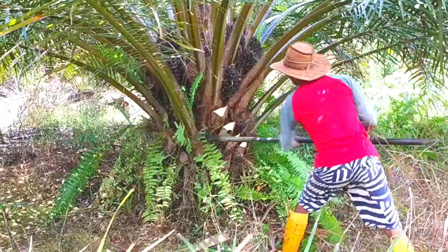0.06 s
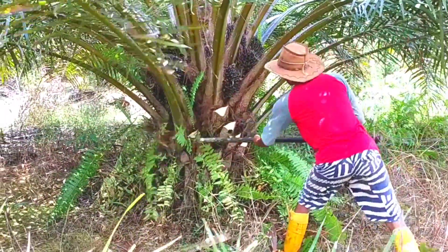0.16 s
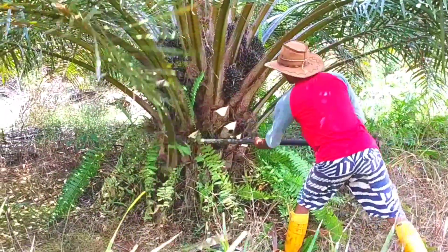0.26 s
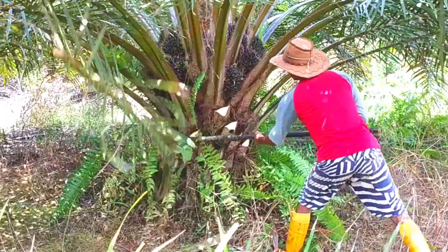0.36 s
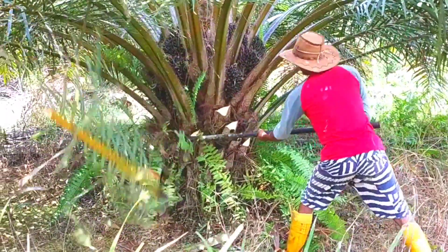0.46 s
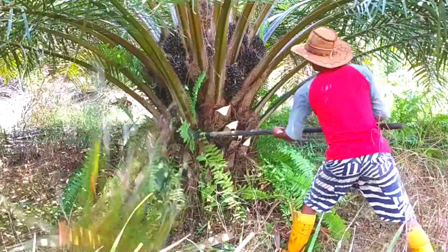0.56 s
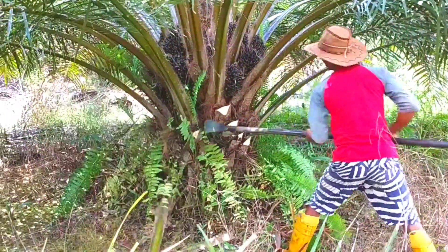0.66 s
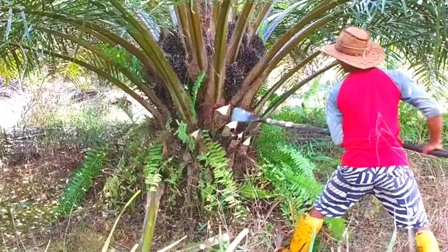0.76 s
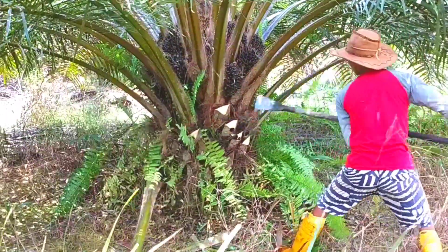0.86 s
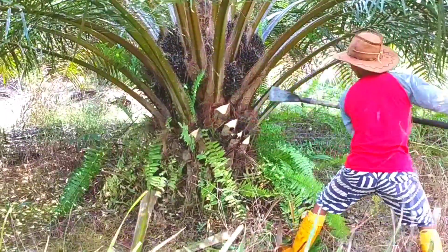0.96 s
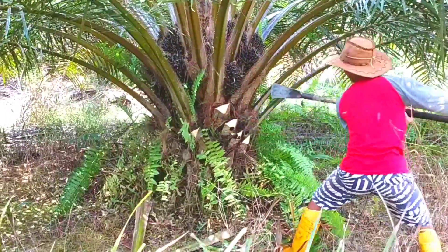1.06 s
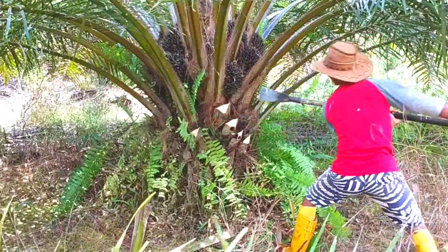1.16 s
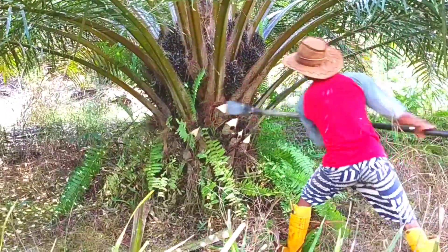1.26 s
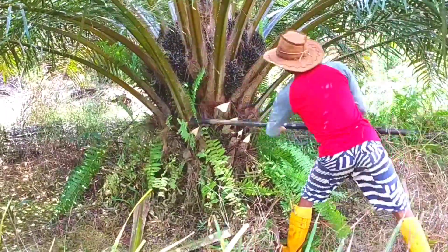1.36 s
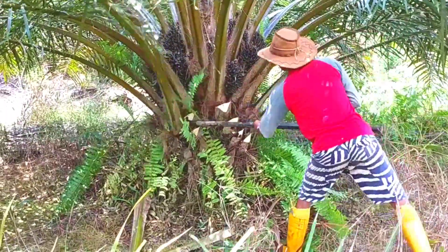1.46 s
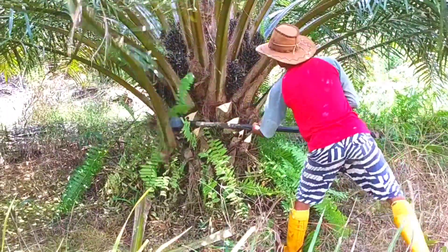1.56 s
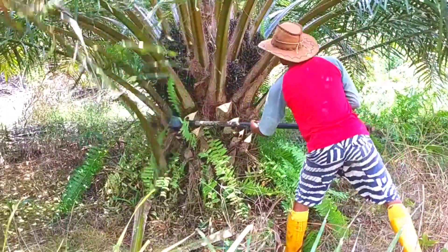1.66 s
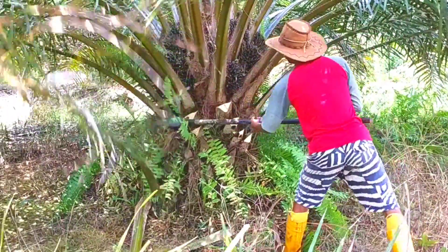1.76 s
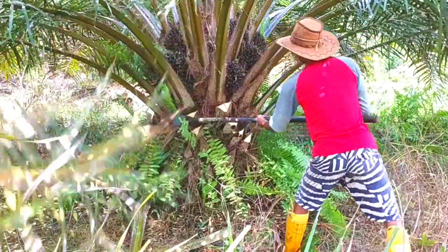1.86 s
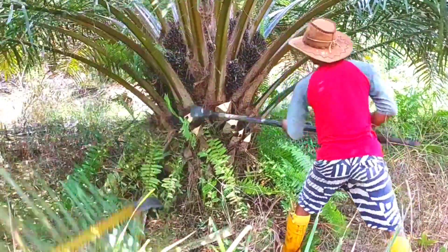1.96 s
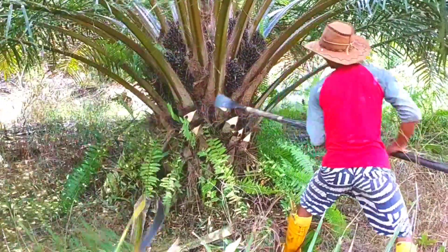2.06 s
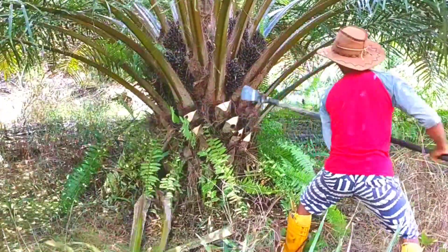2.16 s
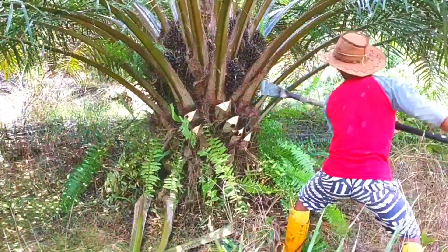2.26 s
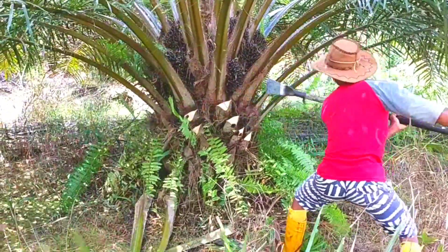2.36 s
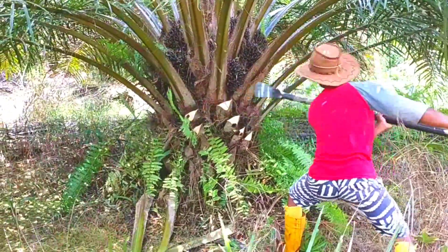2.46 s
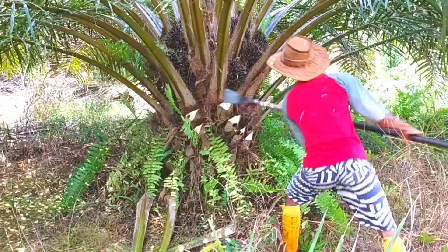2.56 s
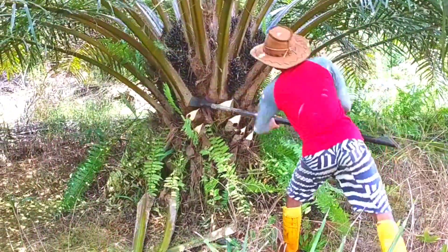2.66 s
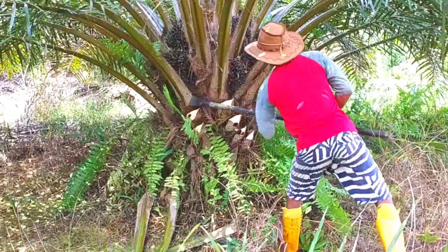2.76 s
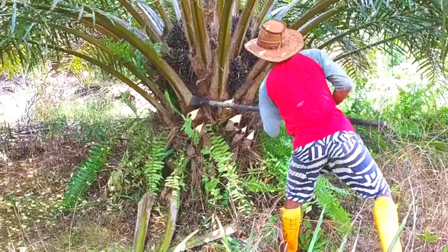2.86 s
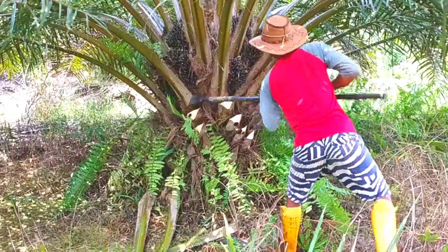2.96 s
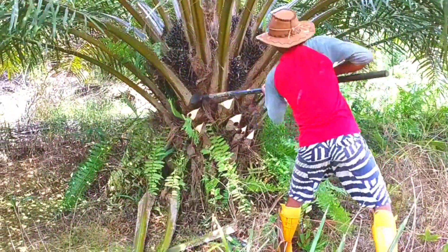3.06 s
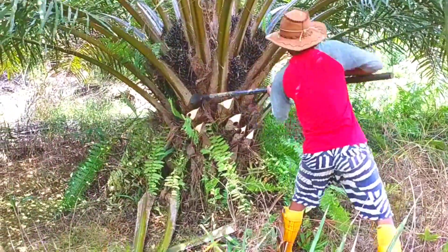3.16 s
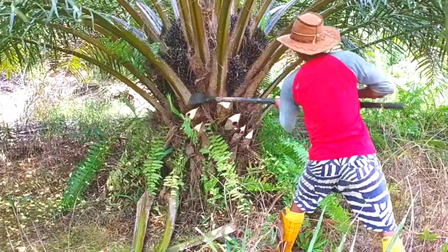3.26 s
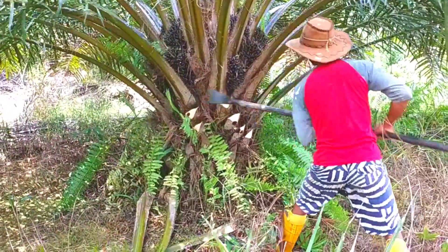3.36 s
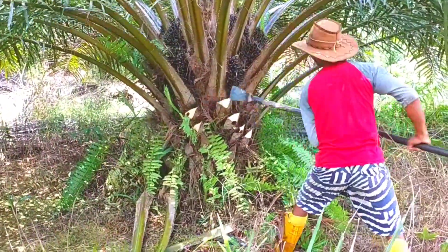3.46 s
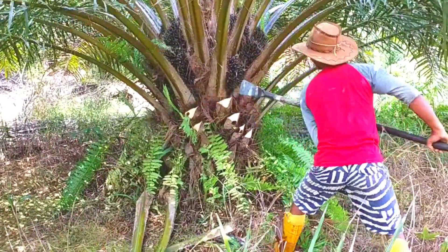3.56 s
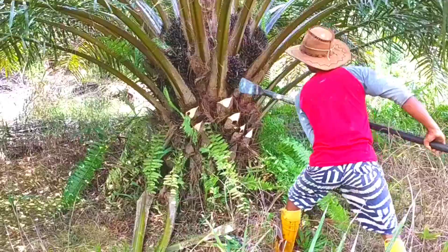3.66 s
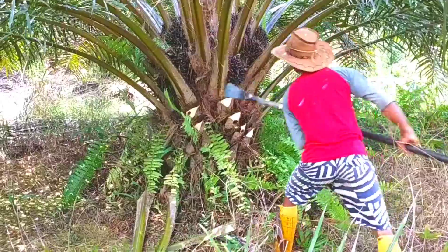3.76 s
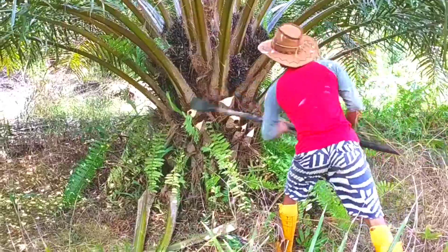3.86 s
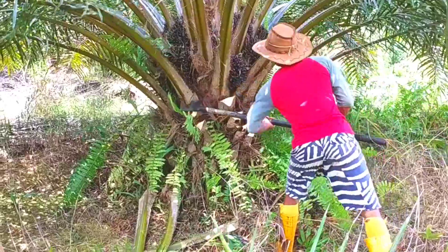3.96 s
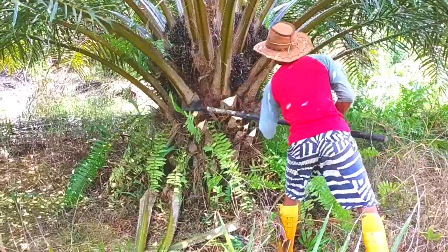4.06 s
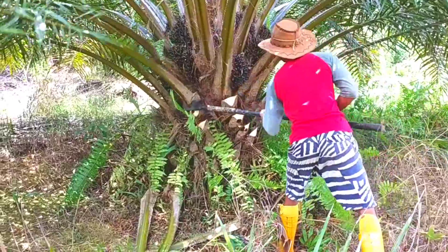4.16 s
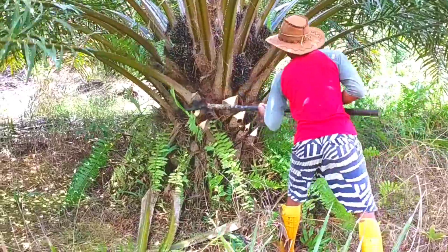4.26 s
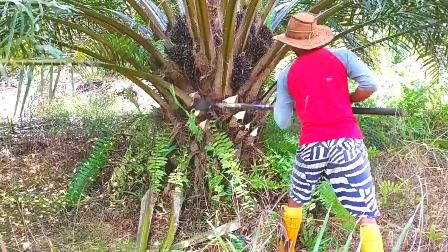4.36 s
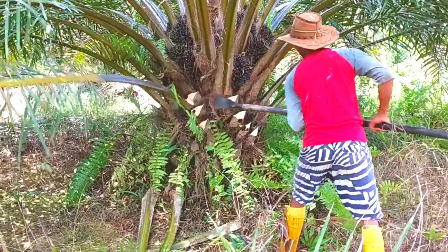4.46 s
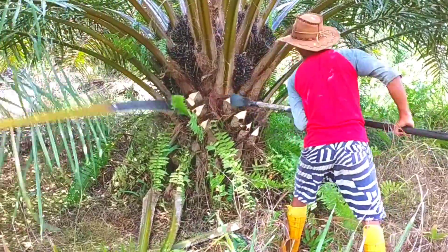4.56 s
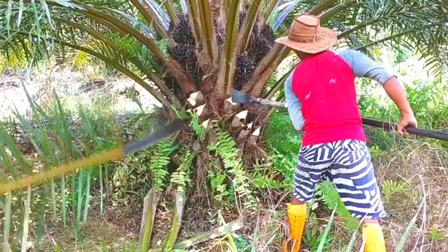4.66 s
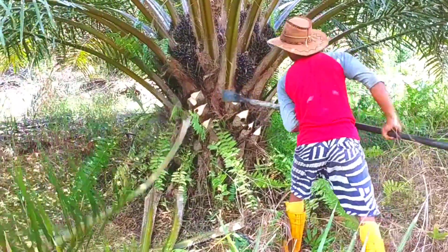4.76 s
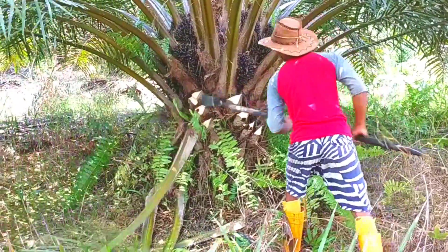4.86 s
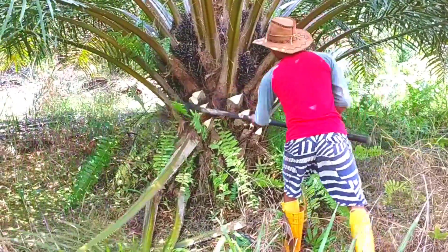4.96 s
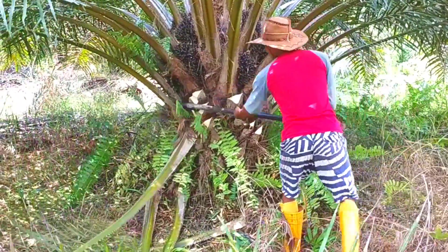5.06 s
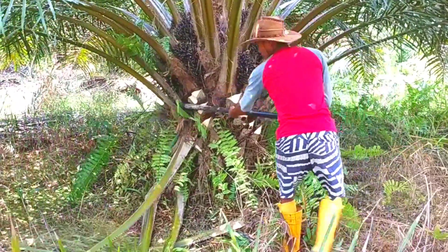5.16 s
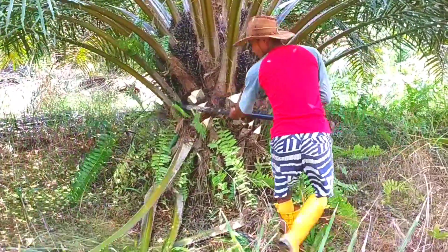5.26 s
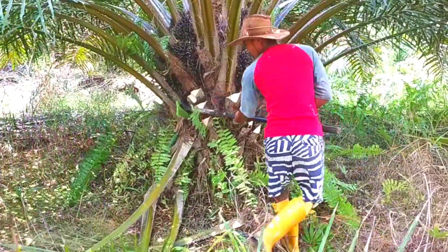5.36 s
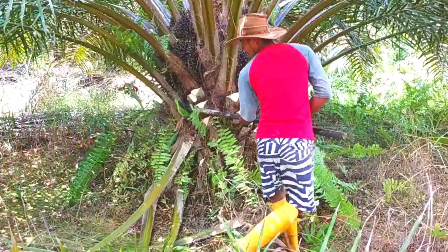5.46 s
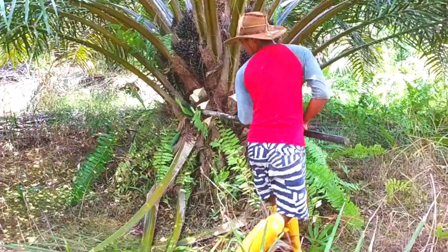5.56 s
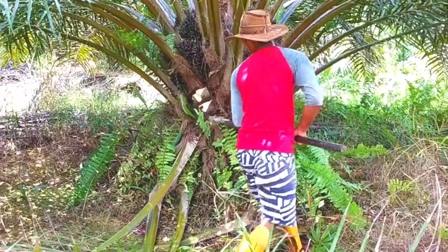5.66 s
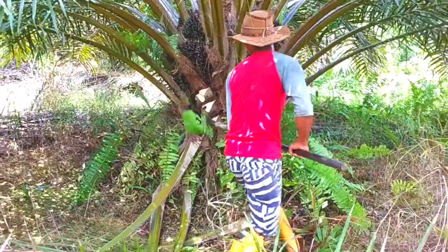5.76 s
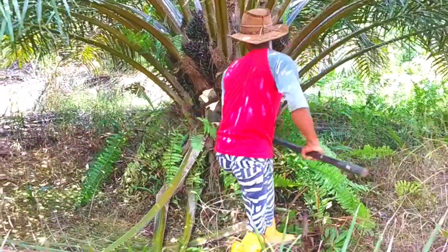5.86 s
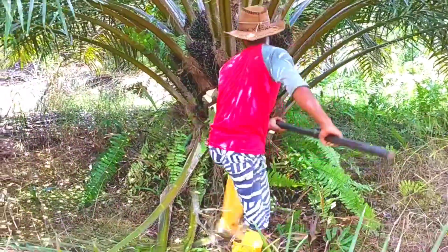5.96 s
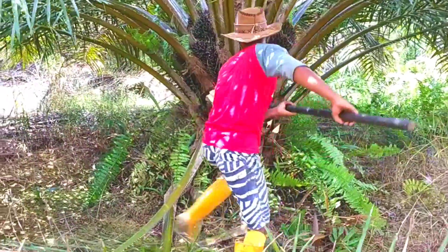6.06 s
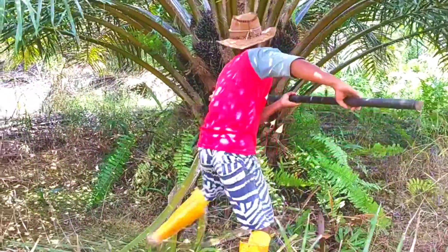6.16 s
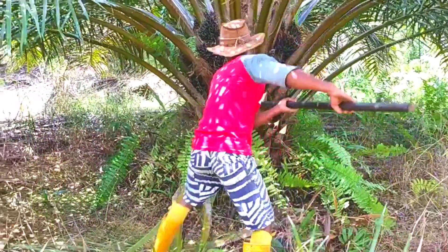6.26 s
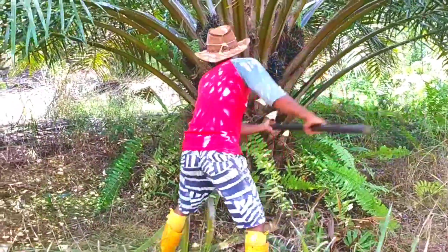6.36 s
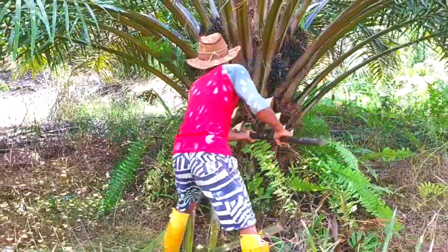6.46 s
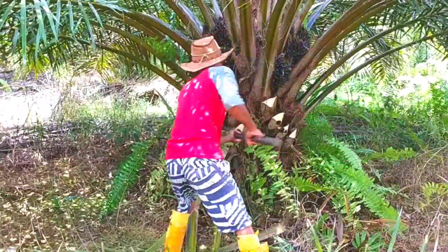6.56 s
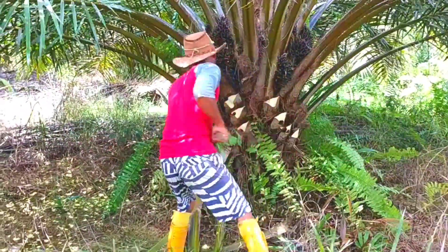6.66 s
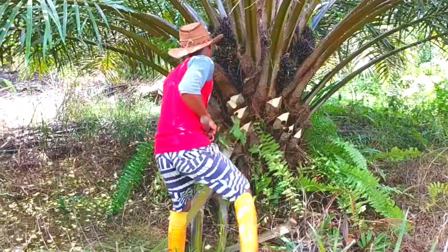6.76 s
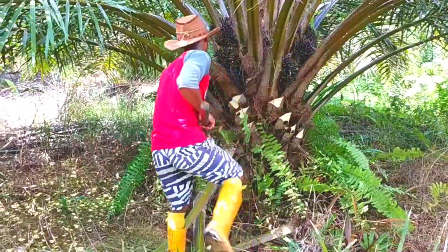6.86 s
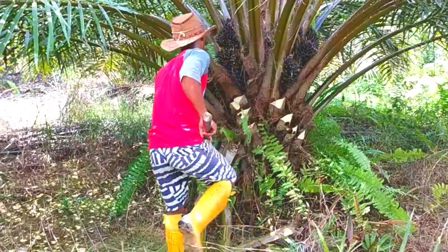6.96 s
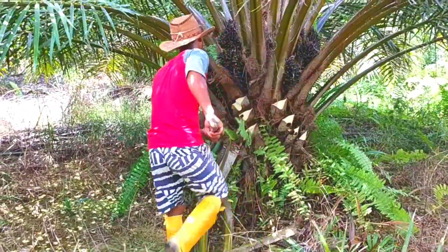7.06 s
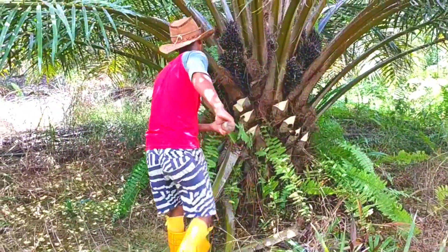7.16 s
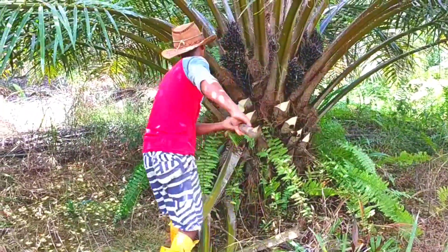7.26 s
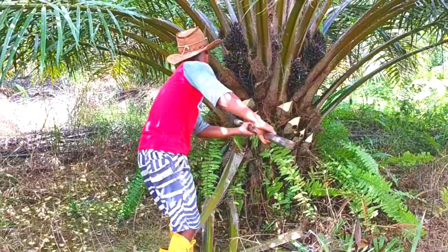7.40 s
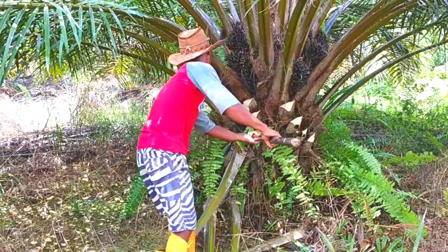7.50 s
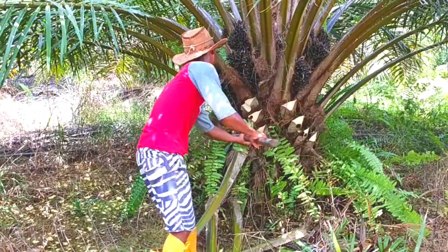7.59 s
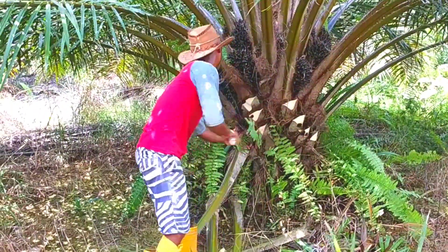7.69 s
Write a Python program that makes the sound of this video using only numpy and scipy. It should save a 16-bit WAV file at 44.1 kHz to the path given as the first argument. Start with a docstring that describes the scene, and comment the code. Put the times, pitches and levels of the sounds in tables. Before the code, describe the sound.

In an open palm grove, distant cicadas shrill thin and high, with a faint cricket pulse and gently stirring leaves. At 0.2 s a steel chisel tears into a frond base, a sharp fibrous crunch; ribs crack and the frond lands around 0.8 s in a bright snap and dry crash. Another snap comes at 1.1 s. A second chop at 1.4 s sends a frond hissing down to the litter at 2.1 s, with crackles after it. A blow at 2.7 s rings more of the blade, followed by small bouncing wood knocks. The hit at 4.0 s is hard and woody; its frond swells into the biggest rustling crash near 4.9 s, then knocks and settles. Boots brush softly through litter from 5.4 s. A splintery chop falls at 6.5 s, light snaps and dull knocks around 7.2 s, and a softer-edged cut at 7.6 s ends it.

```python
"""Cicadas shrill over softly rustling leaves; then a steel chisel on a pole tears into oil palm frond bases.
Each blow is a burst of tiny fibre breaks that rings stalk, blade and trunk; ribs snap as filtered crackle.
Cut fronds swish down as swelling leaf noise and crash on dry litter; wood knocks with short hollow notes.
Later, boots wade through the litter as soft swells of rustle. A thin noise tail echoes the work."""
import sys
import numpy as np
from scipy import signal
from scipy.fft import rfft, irfft, next_fast_len
from scipy.io import wavfile
from scipy.ndimage import map_coordinates

SR = 44100
rng = np.random.default_rng(int(sys.argv[2]) if len(sys.argv) > 2 else 0)


def master_out(mix):
    """Clip the mix to full scale and print it as 16-bit PCM to the path in sys.argv[1]."""
    frames = np.transpose(np.atleast_2d(mix))
    ceiling = np.clip(frames, -1, 1)
    pcm = np.round(ceiling * 32767).astype(np.int16)
    wavfile.write(sys.argv[1], SR, pcm)


N = 340893  # length [samples]
# "t60" is always the time [s] a sound takes to fade by 60 dB.


def amp(db):
    """Turn decibels into a multiplying factor."""
    return 10 ** (np.asarray(db) / 20)


def unit(x):
    """Scale a sound to an rms level of 1."""
    return x / np.sqrt(np.mean(x ** 2) + 1e-20)


def along(points, hz):
    """Read a curve of (frequency [Hz], value) points on a log frequency axis."""
    f, v = np.transpose(points)
    return np.interp(np.log(hz + 1), np.log(f + 1), v)


def wobble(rate):
    """A smooth random curve through rate random points a second."""
    points = rng.standard_normal(int(N * rate / SR) + 4)
    return map_coordinates(points, [np.arange(N) * rate / SR])


def fade(t, t60):
    """Hold at 1 before time zero, then die away."""
    return np.exp(-np.log(1000) * np.maximum(t, 0) / max(t60, 1e-4))


def colour(x, gain_db, size=4096):
    """Filter with the given dB curve over frequency, scaled so the filter has unit energy."""
    spectrum = amp(gain_db(np.fft.rfftfreq(size, 1 / SR))) + 1e-6
    # fold the cepstrum so that the filter responds only after its input, as early as it can
    cepstrum = irfft(np.log(spectrum))
    cepstrum[1:size // 2] *= 2
    cepstrum[size // 2 + 1:] = 0
    response = irfft(np.exp(rfft(cepstrum)))
    return signal.fftconvolve(x, response / np.linalg.norm(response))[:len(x)]


def shaped(x, points):
    """Filter with a fixed list of (frequency [Hz], level [dB]) points."""
    return colour(x, lambda hz: along(points, hz))


def crackle(n, rate, spread_db):
    """Tiny fractures of uneven size at random moments, rate a second on average, rms 1."""
    chance, sign, size = rng.random(n), rng.choice([-1, 1], n), rng.standard_normal(n)
    return unit((chance < rate / SR) * sign * amp(spread_db * np.minimum(size, 2)))


def add(track, s, sound):
    """Mix a sound into the track at time s [s]."""
    i = max(round(s * SR), 0)
    track[i:i + len(sound)] += sound[:N - i]


def cicada(beat_hz, high_hz, low_hz, lag, overtone_db):
    """Two tymbals buckle one after the other, lag [s] apart, on every beat; each chirp falls in pitch."""
    out, t = np.zeros(N), np.arange(SR // 80) / SR
    rate = beat_hz * (1 + .01 * wobble(2))
    beat_count = np.floor(np.cumsum(rate) / SR + rng.random())
    beats = np.flatnonzero(np.diff(beat_count)) / SR
    for s in np.concatenate([beats, beats + lag]):
        late, detune, size = rng.standard_normal(3)
        falling_hz = low_hz + (high_hz - low_hz) * np.exp(-t / .005)
        phase = 2 * np.pi * np.cumsum(falling_hz * (1 + .012 * detune)) / SR
        tone = np.sin(phase) + amp(overtone_db) * np.sin(2 * phase)
        chirp = np.sin(np.pi * t / t[-1]).clip(0) ** 0.29 * fade(t, 0.2) * tone
        add(out, min(s + .001 * late, (N - 1) / SR), amp(2 * size) * chirp)
    return unit(out)


# How loud the cicadas are: (time [s], level [dB])
CICADA_LEVEL = [(0.0, -39), (0.39, -39.5), (1.14, -40), (2.13, -39), (2.56, -39), (4.0, -39.5), (5.02, -38),
                (5.17, -37.5), (5.42, -39.5), (7.06, -40), (7.73, -38)]
# Tone of the many distant cicadas: (frequency [Hz], level per Hz [dB])
CHORUS_TONE = [(5000, -29.5), (6600, -32), (7150, 3), (7600, 0.5), (8100, -1), (8550, -7.5), (8950, -53),
               (12500, -68), (13800, -8.5), (14450, -2), (14900, -5), (15500, -8.5)]


def insects():
    """One near cicada over a chorus blurred into noise, with a faint pulsing cricket below them."""
    times, levels = np.transpose(CICADA_LEVEL)
    level_db = np.interp(np.arange(N) / SR, times, levels)
    near = cicada(beat_hz=24.06, high_hz=8920, low_hz=6730, lag=0.01, overtone_db=-1.0)
    chorus = amp(1.1 * wobble(50)) * shaped(rng.standard_normal(N), CHORUS_TONE)
    swarm = chorus + amp(-5.5 + .8 * wobble(1.5)) * near

    pulse_hz = 6.5 + .8 * wobble(2)
    pulsing_db = 2.5 * np.sin(2 * np.pi * np.cumsum(pulse_hz) / SR)
    cricket_tone = [(4800, -31.5), (5500, -17.5), (5950, -13.5), (7000, -38.5)]
    cricket = amp(-59.0 + pulsing_db) * shaped(rng.standard_normal(N), cricket_tone)
    return amp(level_db) * swarm + cricket


# Cut fronds coming down: (cut time [s], landing time [s], rustle on landing [dB], swell [dB per s],
# leaflet hiss over the rustle [dB], sagging time [s], settling t60 [s],
# crash level [dB], crash rise setting [s], crash length [s])
FALLING_FRONDS = [(0.191, 0.78, -46.5, 3, 4.5, 0.35, 3.2, -18, 0.0081, 0.011),
                  (1.453, 2.148, -38, 7, 6.5, 0.18, 1.5, -24, 0.04, 0.0042),
                  (4.0, 4.938, -33, 13.5, 1.5, 0.09, 1.7, -18, 0.065, 0.08)]
# Boots wading through litter: (time [s], rustle level [dB])
BOOT_STEPS = [(5.45, -48), (5.83, -47.5), (6.11, -55), (6.45, -55.5), (6.882, -59.5), (7.42, -55)]
# Rustle and hiss levels here are settings; fronds() adds its own gains.
STEP_S, STEP_HISS_DB = 0.17, 8.5  # half length of a step; its hiss over its rustle
OPENING_SWAY_DB = -53  # the crown is already swaying at the start
SHAKE_T60_S, SHAKE_HISS_DB = 5.5, -11.5  # sway after a blow; its hiss over its rustle
SHIVER_DB, SHIVER_T60_S = -13, 0.35  # leaflet hiss right after a blow, relative to the blow
STILL_RUSTLE_DB, STILL_HISS_DB = -64, -55.5  # the grove at rest


def leaf_motion():
    """Strength of rib rustle and leaflet hiss: blows shake the crown, fronds fall and settle, boots wade."""
    t = np.arange(N) / SR
    moves = [(amp(OPENING_SWAY_DB) * fade(t, SHAKE_T60_S), SHAKE_HISS_DB)]  # (rustle, hiss over it [dB])
    for s, *_, shake_db in CHISEL_BLOWS:
        moves.append((amp(shake_db) * (t > s) * fade(t - s, SHAKE_T60_S), SHAKE_HISS_DB))
    for cut, landing, db, swell, hiss_db, sagging, t60, *_ in FALLING_FRONDS:
        falling = (t > cut) * amp(db - swell * np.maximum(landing - t, 0))
        moves.append((falling * fade(t - landing - sagging, t60), hiss_db))
    for s, db in BOOT_STEPS:
        moves.append((amp(db) * np.exp(-((t - s) / STEP_S) ** 2), STEP_HISS_DB))
    shiver = sum(amp(db + SHIVER_DB) * (t > s) * fade(t - s, SHIVER_T60_S) for s, db, *_ in CHISEL_BLOWS)
    # separate movements add up by their energy
    rustle_energy = sum(move ** 2 for move, _ in moves)
    hiss_energy = sum((amp(db) * move) ** 2 for move, db in moves)
    rustle = np.sqrt(amp(STILL_RUSTLE_DB) ** 2 + rustle_energy)
    hiss = np.sqrt(amp(STILL_HISS_DB) ** 2 + shiver ** 2 + hiss_energy)
    return rustle, hiss


# Tone of brushing leaflets: (frequency [Hz], level per Hz [dB])
LEAFLET_TONE = [(2500, -31), (4500, -16), (6500, -11.5), (8000, -3.5), (10000, -10.5), (12500, -6),
                (14500, -4), (15500, 5)]
# Tone of scraping leaf ribs: (frequency [Hz], level per Hz [dB])
RIB_TONE = [(450, -39.5), (750, -8.5), (1100, -3.5), (1450, -3), (2200, 3.5), (3000, 0.5), (4000, -2.5),
            (5000, -11), (7000, -6)]
# Low tone of dragging, rumble and shudder: (frequency [Hz], level per Hz [dB])
GROUND_TONE = [(20, 2.5), (60, 3), (150, -4), (400, -1.5), (650, -8), (1200, 0.5), (3000, -98.5)]
DRAG_DB, STILL_RUMBLE_DB = -22.5, -67  # drag relative to the motion; rumble at rest; before later gain


def fronds(motion, leaflets):
    """Leaflets brush past each other in flurries while ribs scrape, tick and drag over a faint rumble."""
    flurry = wobble(45)
    brushes = crackle(N, rate=6000, spread_db=6)
    scrapes = crackle(N, rate=2500, spread_db=4.5)
    hiss = leaflets * amp(6.0 + 2 * flurry) * shaped(brushes, LEAFLET_TONE)
    rustle = motion * amp(0.3 + 1.4 * flurry) * shaped(scrapes, RIB_TONE)
    drag_level = np.hypot(amp(DRAG_DB) * motion, amp(STILL_RUMBLE_DB)) * amp(3.0 + 1.1 * wobble(29))
    drag = drag_level * shaped(rng.standard_normal(N), GROUND_TONE)
    ticks, t = np.zeros(N), np.arange(SR // 50) / SR
    for when, pitch, size in rng.random((450, 3)):  # rib against rib, each at its own pitch
        note = np.sin(2 * np.pi * 1100 * 3.5 ** pitch * t)
        tick = fade(t, .011) * (note + .7 * rng.standard_normal(len(t)))
        add(ticks, when * N / SR, (.8 + 2.4 * size ** 3) * tick)
    return hiss + rustle + drag + motion * ticks


def ring(modes, t):
    """Struck modes (frequency [Hz], level [dB], t60 [s]) swell over their first cycle and die away."""
    out = 0
    for k, (hz, db, t60) in enumerate(modes):
        swell = np.sin(np.pi / 2 * np.minimum(hz * t, 1)) ** 2  # full after one cycle
        out = out + (-1) ** k * amp(db) * swell * fade(t, t60) * np.sin(2 * np.pi * hz * t)
    return out


# Chisel blows: (time [s], level [dB], tearing time [s], fade t60 [s], trunk thud relative to blow [dB],
# hollow tone [dB], bite tone [dB], splinter tone [dB], rise [s], resonance ratio,
# blade ring relative to blow [dB], last fibre crack [dB], low shudder [dB], crown rustle [dB])
CHISEL_BLOWS = [(0.1692, -12, 0.028, 0.1, -30, -4, -3, -1.5, 0.0033, 1.06, -26, -21, -37.5, -47),
                (1.4362, -14.5, .033, 0.04, -20, -3, 0.5, -1.5, 0.0036, 0.96, -19, -13, -46, -41.5),
                (2.742, -14, 0.018, 0.043, -11.5, -4, 2.5, 2.5, 0.0024, 0.91, -3.5, -30, -37.5, -42.5),
                (3.984, -13, 0.0036, 0.23, -0.5, -3.5, 0.5, -2, 0.0019, 0.98, 0, -25.5, -49, -46.5),
                (6.497, -15, 0.03, 0.21, -14, 4.5, 3.5, 5, 0.0086, 0.9, -6.5, -23, -39, -53),
                (7.623, -18, 0.035, 0.14, -21, 1, -3, -0.5, 0.028, 0.99, -7, -2.5, -49, -52)]
# Tone of a frond base being cut: (frequency [Hz], level per Hz [dB])
STALK_TONE = [(40, -11.5), (200, -19.5), (400, -20), (600, -13.5), (1000, -8.5), (1450, -11), (2000, -10.5),
              (2700, 0.5), (3800, -5), (5000, -13.5), (7800, -8), (10500, -18), (15000, -11)]
# Its resonances and the dead band between them, before each blow's resonance ratio:
# (frequency [Hz], width [Hz], lift [dB])
STALK_RESONANCES = [(807, 250, 9.5), (1218, 253, 7), (1480, 180, -5.5), (1876, 665, 14), (2684, 280, 6),
                    (3740, 310, 1)]
# Steel damped by the cut: (frequency [Hz], level [dB], t60 [s])
BLADE_RING = [(1776, 8, 0.045), (1112, -7, 0.098)]
# The damp trunk: (frequency [Hz], level [dB], t60 [s])
TRUNK_RING = [(444, 4.5, 0.033), (586, -13.5, 0.078), (763, 4, 0.036), (1080, 3, 0.035)]


def chops():
    """Fibres burst as the edge travels; they ring the stalk, and the blow rings blade and trunk."""
    out, t = np.zeros(N), np.arange(SR // 3) / SR
    for (s, db, tearing, t60, thud_db, hollow_db, bite_db, splinter_db,
         rise, ratio, ring_db, last_db, shudder_db, _) in CHISEL_BLOWS:
        attack = np.minimum(t / max(rise, 1e-4), 1)
        # the edge slows in the stalk, the last bundle gives way, and the split fibres settle
        after_tear = 0.17 * fade(t - tearing, 0.02) + 0.98 * fade(t - tearing, t60)
        last_bundle = amp(last_db) * fade(np.abs(t - tearing), 0.0088)
        force = attack * fade(t, 0.4) * after_tear + last_bundle
        tint = [(120, -0.54), (400, -1.8), (750, hollow_db), (1150, hollow_db), (1900, -1.1),
                (3200, bite_db), (6000, splinter_db)]

        def stalk_db(hz):
            """The stalk's tone with this blow's tint and shifted resonances."""
            lifts = sum(lift * np.exp(-2 * ((hz / ratio - f) / w) ** 2) for f, w, lift in STALK_RESONANCES)
            return along(STALK_TONE, hz) + along(tint, hz) + lifts

        tear = colour(force * crackle(len(t), rate=7000, spread_db=0.0), stalk_db)
        add(out, s, amp(db) * (tear + amp(ring_db) * attack * ring(BLADE_RING, t)))
        add(out, s + rise, amp(db + thud_db) * ring(TRUNK_RING, t))
        # the whole crown shudders once the blade stops
        shudder = fade(t, 0.34) * shaped(rng.standard_normal(len(t)), GROUND_TONE)
        add(out, s + tearing, amp(shudder_db) * shudder)
    return out


# Lesser snaps: level follows the rustle, before the gain in snaps()
SMALL_SNAPS_PER_S, SMALL_SNAP_DB, SMALL_SNAP_SPREAD_DB = 11, 12, -1


def small_snaps(motion):
    """Rows of chance snaps, commoner and louder the more the leaves move."""
    count = int(SMALL_SNAPS_PER_S * N / SR)
    # more motion takes a larger share of the snaps
    share = np.cumsum(np.sqrt(motion))
    rows = []
    for when, size, body in rng.random((count, 3)):
        i = np.searchsorted(share, when * share[-1])
        db = 20 * np.log10(motion[i]) + SMALL_SNAP_DB + SMALL_SNAP_SPREAD_DB * (2 * size - 1)
        rows.append((i / SR, db, -4 - 18 * body, -1))
    return rows


# The loudest ribs snapping, levels before the gains below:
# (time [s], level [dB], body tone [dB], first crack [dB])
RIB_SNAPS = [(0.242, -10.5, -5, -1), (0.3311, -20, -6, -2.5), (0.5354, -19, -10.5, -4),
             (0.607, -24.5, -36, 5), (0.7497, 3.5, -16.5, -8.5), (0.7804, -20, -7, 6.5),
             (1.1127, -2.5, -18, -9), (1.928, -13, -22, 0.5), (1.96, -16.5, -26.5, 3),
             (2.158, -9.5, -13, 2.5), (2.275, -6.5, -17.5, -2.5), (3.0302, -23.5, -2, -2),
             (3.8615, -26, -19, -2), (4.3705, -12.5, -10, -2), (4.8758, -14.5, 0.5, 7.5),
             (5.0624, -9, 4.5, -3), (5.7905, -21, 2, -18), (6.4016, -17, -17, 2),
             (7.1387, -15.5, -27, -5.5), (7.2894, -8, -19.5, -5.5), (7.3177, -10, -19.5, -7.5),
             (7.5523, -24, -23, 3.5)]


def snaps(motion):
    """A bright crack, its scattered bounce off the ground, and a short shiver of leaves."""
    out, t = np.zeros(N), np.arange(SR // 5) / SR
    for s, db, body_db, crack_db in RIB_SNAPS + small_snaps(motion):
        crack = 1.3 * amp(crack_db) * fade(t - .0015, .008)
        bounce = .24 * (t > .005) * fade(t - .008, .03)
        shiver = .15 * fade(t, .22)
        splinters = (crack + bounce + shiver) * crackle(len(t), rate=15000, spread_db=3)
        tone = [(200, body_db - 6.5), (1100, body_db + 6), (3200, body_db + 15),
                (5500, -5.5), (8000, 2.5), (15000, 1.5), (17000, -8.0)]
        add(out, s, amp(db - 11.5) * shaped(splinters, tone))
    return out


# A cut piece landing and bouncing, level before the gain in knocks():
# (first contact time [s], level [dB], gap between bounces [s], weight [dB])
BOUNCING_PIECES = [(2.868, -30.5, 0.033, -15), (5.113, -24, 0.03, -17)]
TUMBLE_HZ, TUMBLE_LOSS_DB = 1110, 4.5  # centre of its random notes; loss per bounce


def tumbles(count=3):
    """Rows of knocks: each bounce is weaker and has a slightly different note."""
    rows = []
    for s, db, gap, weight_db in BOUNCING_PIECES:
        for k in range(count):
            note_hz = TUMBLE_HZ * (1 + 0.11 * rng.standard_normal())
            rows.append((s + k * gap, db - TUMBLE_LOSS_DB * k, weight_db, note_hz))
    return rows


# Frond butts, pole and boots knocking, levels and weights before the gains below:
# (time [s], level [dB], weight [dB], pitch [Hz])
WOOD_KNOCKS = [(0.243, -21.5, -26, 950), (0.594, -27, -36, 860), (0.754, -26, -20, 1120),
               (1.527, -26, -21.5, 1020), (2.841, -36.5, -20, 856), (3.336, -40, -30, 1070),
               (4.576, -26.5, -41, 1150), (4.886, -24, -48, 695), (4.942, -31, -10, 1250),
               (5.062, -23, -23.5, 1100), (6.4, -35.5, -10.5, 927), (7.263, -33, -4.5, 930),
               (7.288, -38, -13, 799), (7.357, -37, -9.5, 1050)]
# Tone of dull wood: (frequency [Hz], level per Hz [dB])
WOOD_TONE = [(40, -9.5), (150, 1.5), (400, 3.5), (650, -6), (1000, -2.5), (1450, -10), (1900, -0.5),
             (3000, -10), (6000, -18.5), (15000, -42.5)]


def knocks():
    """Dull woody contacts, each with one hollow note, deeper when more weight is behind them."""
    out, t = np.zeros(N), np.arange(SR // 6) / SR
    for s, db, weight_db, pitch_hz in WOOD_KNOCKS + tumbles():
        push = np.minimum(t / .002, 1) * fade(t - .007, .04) * crackle(len(t), rate=5000, spread_db=3)

        def wood_db(hz):
            """The wood's tone with this knock's note and low weight."""
            note = 8.4 * np.exp(-((hz - pitch_hz) / 140) ** 2)
            return along(WOOD_TONE, hz) + note + along([(350, weight_db + 12), (800, 0.017)], hz)

        add(out, s, amp(db - 2.5) * colour(push, wood_db))
    return out


# Tone of a leaf hitting dry litter: (frequency [Hz], level per Hz [dB])
CRASH_TONE = [(24, -35), (40, -28), (150, -8.5), (653, -11), (1080, -4.5), (1160, -2), (1730, -4),
              (2390, 1.5), (3220, -5.5), (4130, -3.5), (6010, -8), (7910, 2), (9410, -6.5), (15500, 3)]
CRASH_T60_S = 0.43  # the crash of a landing fades


def landings():
    """The whole leaf meets dry litter in a dense burst of crackles."""
    t = np.arange(N) / SR
    swell = np.zeros(N)
    for _, s, *_, db, rise, length in FALLING_FRONDS:
        swell += amp(db) * fade(s - t, 7 * rise) * fade(t - s - length, CRASH_T60_S)
    return shaped(swell * amp(2 * wobble(110)) * crackle(N, rate=5000, spread_db=5), CRASH_TONE)


# How long the grove's echo lasts: (frequency [Hz], t60 [s])
GROVE_FADE = [(100, 0.3), (1000, 0.075), (3000, 0.31), (8000, 0.25), (15000, 0.15)]


def grove(x):
    """Trunks and crowns scatter a thin tail, made of noise that fades at its own pace in each band."""
    hz, t, bands = signal.stft(rng.standard_normal(SR // 2), SR, nperseg=256)
    fading = amp(-60 * t / along(GROVE_FADE, hz)[:, None])
    tail = signal.istft(bands * fading, SR, nperseg=256)[1]
    return signal.fftconvolve(x, tail / np.linalg.norm(tail))[:N]


def scene():
    """The work sounds in the grove, among moving leaves and insects."""
    motion, leaflets = leaf_motion()
    work = chops() + snaps(motion) + knocks()
    echo = amp(-8.5) * grove(work)
    return (work + echo + fronds(motion, leaflets) + landings() + insects())[None]


TOP_HZ = 15560  # nothing is kept from here up


def record(dry):
    """Round off the highest peaks, then remove everything above the band limit."""
    held = dry / (1 + np.abs(dry) ** 6) ** (1 / 6)
    m = next_fast_len(N + SR // 2)
    kept = np.fft.rfftfreq(m, 1 / SR) < TOP_HZ
    return irfft(rfft(held, m) * kept, m)[..., :N]


dry = scene()
out = record(dry)
master_out(out)
```